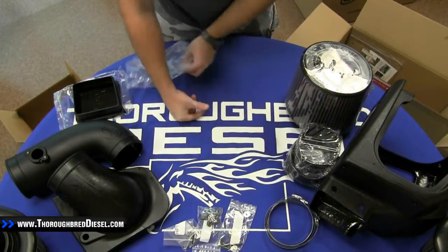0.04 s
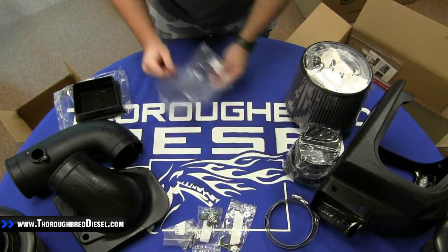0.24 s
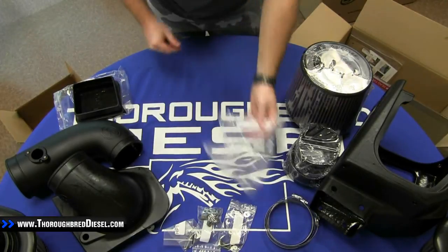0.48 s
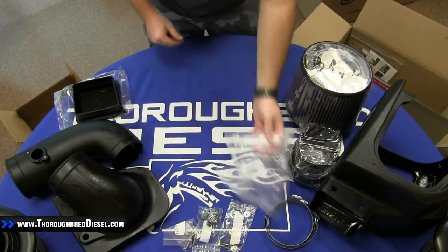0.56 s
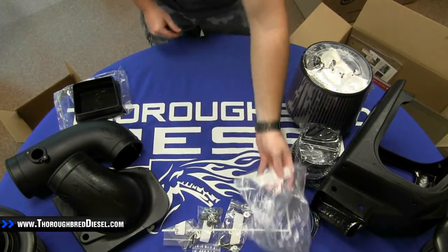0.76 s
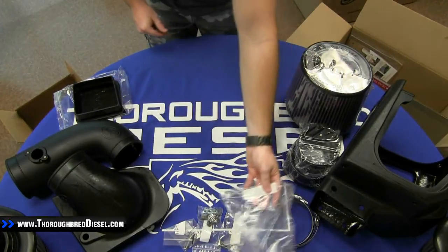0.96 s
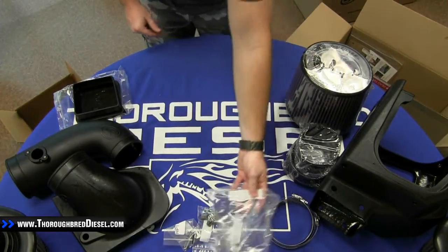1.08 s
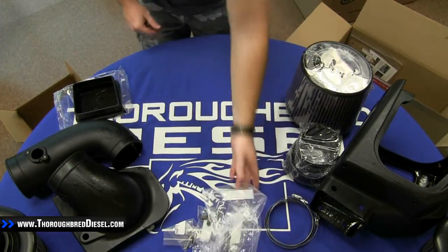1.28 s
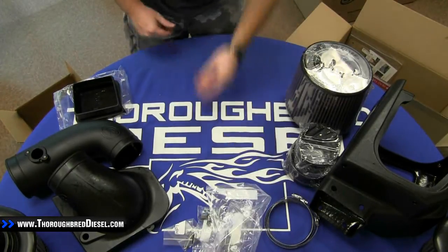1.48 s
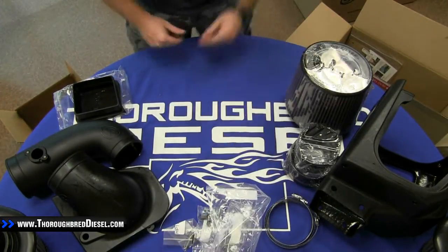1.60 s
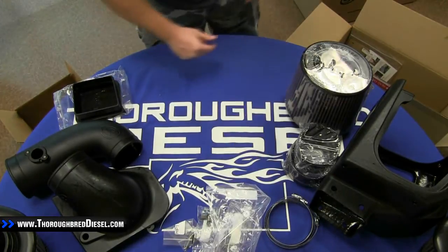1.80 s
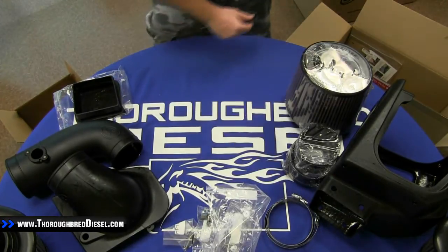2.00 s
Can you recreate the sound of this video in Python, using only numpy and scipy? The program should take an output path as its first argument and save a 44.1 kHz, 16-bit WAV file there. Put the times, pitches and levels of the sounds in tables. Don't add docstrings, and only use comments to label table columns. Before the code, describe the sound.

Crisp plastic bag rustling with a low table thump, a pause, then a brief crinkly landing

```python
import sys
import numpy as np
from scipy import signal
from scipy.fft import rfft, irfft, next_fast_len
from scipy.io import wavfile

SR = 44100
rng = np.random.default_rng(int(sys.argv[2]) if len(sys.argv) > 2 else 0)


def transcribe(u):
    v = np.clip(np.atleast_2d(u).T, -1, 1)
    q = np.round(v * 32767).astype(np.int16)
    wavfile.write(sys.argv[1], SR, q)


def voltage_ratio(decibels):
    exponent = np.asarray(decibels, float) / 20
    return 10 ** exponent


N = 90404
OPPOSITE = np.array([[1], [-1]])


def rms_one(x):
    return x / np.sqrt(np.mean(x ** 2) + 1e-20)


def level(rows):
    time_s, level_db = np.transpose(rows)
    return voltage_ratio(np.interp(np.arange(N) / SR, time_s, level_db, left=-140, right=-140))


def at_hz(points, hz):
    points_hz, points_db = np.transpose(points)
    return np.interp(np.log(hz), np.log(points_hz), points_db, left=-70, right=-70)


def drift(rate_hz):
    r = np.exp(-80 * np.pi * rate_hz / SR)
    white = rng.standard_normal(N // 40 + 2002)
    slow = signal.lfilter([1], [1, -2 * r, r * r], white)[2000:]
    return np.interp(np.arange(N) / 40, np.arange(len(slow)), rms_one(slow))


def ring(x, hz, t60_s):
    r = voltage_ratio(-60 / (t60_s * SR))
    w = 2 * np.pi * hz / SR
    return signal.lfilter([0, np.sin(w)], [1, -2 * r * np.cos(w), r * r], x + 1e-18)


def click(time_s, height=1):
    x = np.zeros(N)
    x[np.minimum(np.asarray(time_s) * SR, N - 1).astype(int)] = height
    return x


def colour(sources, spectrum, patchy_db, rate_hz):
    edges_hz = 20 * 2 ** np.arange(0, 9.9, 1 / 3)
    together = drift(rate_hz)
    for k, (low, high) in enumerate(zip(edges_hz, edges_hz[1:])):
        hz = np.sqrt(low * high)
        sos = signal.butter(2, [low, high], "band", fs=SR, output="sos")
        band = signal.sosfilt(sos, sources[k % len(sources)])
        flicker_db = patchy_db * (together + 1.6 * drift(rate_hz))
        yield hz, band * voltage_ratio(at_hz(spectrum, hz) + flicker_db)


def noise(spectrum, patchy_db, rate_hz):
    white = rng.standard_normal((2, N))
    return rms_one(sum(band for _, band in colour(white, spectrum, patchy_db, rate_hz)))


def snaps():
    # (time [s], peak
    # [dB], ring [Hz], length [cycles], trailing flurry [dB])
    lift_snaps = [(.0128, -38.5, 4500, 2.5, 2), (.016, -41, 1340, 7.1, 0), (.0215, -47, 4200, 4.5, -7),
                  (.0308, -21.5, 4380, 1.95, -4.5), (.0368, -39, 6500, 3.5, -3),
                  (.0453, -25.5, 6260, 2.2, -3), (.0525, -25, 1350, 1.8, -6.5), (.0532, -29, 9850, 7.6, -9),
                  (.0605, -36, 2520, 1.6, -11), (.034, -38.5, 1450, 4.3, -16), (.047, -36, 1500, 4.6, -6),
                  (.057, -36.5, 1140, 4.8, -3), (.053, -23, 5420, 5.2, 1.5), (.0682, -47, 3000, 0.9, 12),
                  (.0883, -25.5, 2780, 1.8, -2), (.0903, -28.5, 4580, 5.2, 2.5),
                  (.0915, -33, 10300, 5, -12), (.0988, -31, 5250, 3, -8), (.1095, -30, 6540, 2.5, -6),
                  (.1385, -43, 4500, 7, -17), (.1498, -37, 2600, 1.1, -28), (.179, -42, 2150, 3.2, -6),
                  (.1172, -33, 4560, 2.8, 6), (.119, -29, 830, 2.03, -38), (.2384, -27.5, 5280, 2.8, -11),
                  (.2545, -33.5, 5050, 7.2, -27), (.2665, -38.5, 3820, 3.3, 0.5), (.2688, -40, 6200, 3, -9),
                  (.283, -41, 5500, 1.6, 5), (.2878, -36, 5200, 2, -10), (.2987, -32.5, 5900, 3.2, -2),
                  (.3032, -31.5, 5750, 5.2, 0), (.32395, -10.5, 5050, 4.4, -17),
                  (.3341, -22, 4960, 3.2, -1), (.3245, -36.5, 1120, 2.7, -5),
                  (.3338, -32.5, 1027, 1.93, -27), (.3362, -26.5, 5700, 4.1, -5),
                  (.3505, -44, 9800, 6.5, -12)]
    land_snaps = [(1.223, -45.5, 2550, 1.3, 5.5), (1.2329, -29.5, 3940, 1.36, -8.5),
                  (1.239, -26, 5000, 1.5, -2.5), (1.2398, -38, 5660, 3.4, -12),
                  (1.2452, -43, 4650, 3.7, -5), (1.2457, -39, 1480, 1.6, -12),
                  (1.249, -27.5, 2850, 2.1, -3), (1.2493, -28, 4840, 4.8, -9), (1.2503, -34, 3540, 2.7, -9),
                  (1.2514, -28, 4500, 5.1, -1.5), (1.2538, -46, 3760, 2.3, -16),
                  (1.2625, -39, 2820, 3, -20), (1.2655, -52, 4500, 2.7, -8), (1.277, -46, 2970, 2.5, -3),
                  (1.306, -46.5, 1170, 1.2, -12), (1.3254, -38.5, 2500, 0.99, -9),
                  (1.3474, -45, 1490, 1.2, -6), (1.6966, -26, 3550, 1.32, -16.5),
                  (1.6978, -37.5, 2310, 2.1, -10)]
    fold_db, fold_t60_s = -40.5, 0.0094
    flurry_s, flurry_hz, flurry_width_hz = 0.0023, 4500, 10400
    size = 1500
    rows, out, t = lift_snaps + land_snaps, np.zeros(N), np.arange(size) / SR
    cut = signal.butter(1, [600, 7000], "band", fs=SR, output="sos")
    for time_s, peak_db, hz, cycles, flurry_db in rows:
        swell = np.sin(np.pi * np.minimum(t * hz / cycles, 1) ** 1.15)
        pop = -np.sin(2 * np.pi * hz * t) * swell
        pop = pop + voltage_ratio(fold_db) * ring(pop, hz, fold_t60_s)
        z = rng.standard_normal(size)
        flurry = signal.sosfilt(cut, z * np.abs(z) * np.exp(-t / flurry_s))
        flurry = flurry + 0.58 * ring(flurry, flurry_hz, 1.6 / flurry_width_hz)
        flurry = flurry / np.abs(flurry).max()
        i = int(time_s * SR)
        out[i:i + size] += voltage_ratio(peak_db) * (pop + voltage_ratio(flurry_db) * flurry)
    return out


def crinkle():
    # (time [s], level [dB])
    lift = [(0, -60), (.03, -46.5), (.06, -44.5), (.115, -44.5), (.15, -49.5), (.23, -58), (.305, -51.5),
            (.323, -54), (.338, -48.5), (.42, -70), (.62, -66)]
    land = [(1.21, -74), (1.225, -52.5), (1.25, -41), (1.275, -59.5), (1.3, -63), (1.34, -63), (1.4, -65),
            (1.5, -78)]
    stir = [(.84, -106), (.91, -63), (1.0, -82)]
    # (frequency [Hz], density [dB per Hz])
    film_colour = [(150, -45), (250, -0.5), (356, -5), (1160, -8), (1320, -8.5), (2310, -13), (4610, -8.5),
                   (10300, -22.5), (14000, -35)]
    clicks_per_s, spread_db = 2500, 3.5
    sizes = voltage_ratio(spread_db * np.minimum(rng.exponential(1, N), 3.2)) * rng.choice([-1, 1], N)
    born = rng.random(N) < clicks_per_s * voltage_ratio(3 * drift(60)) / SR
    grains = sizes * born + 0.26 * rng.standard_normal(N)
    film = sum(band for _, band in colour([grains, -grains], film_colour, patchy_db=1.2, rate_hz=40))
    return rms_one(film) * (level(lift) + level(land) + level(stir))


def bag():
    film_top_hz = 11100
    sos = signal.butter(6, film_top_hz, fs=SR, output="sos")
    return signal.sosfilt(sos, snaps() + crinkle())


def table_thumps():
    # (time [s], strength [0-1])
    thumps = [
        (.126, .98),
        (.1521, .72),
    ]
    # (frequency [Hz], signed height, t60 [s])
    low_modes = [(93.67, .503, .214), (108.41, -.6, .18), (111.53, .067, .379), (127.63, .474, .144),
                 (134.14, -.361, .5), (152.7, -.102, .08)]
    # (frequency [Hz], level [dB], t60 [s])
    weak_modes = [(64, -35, .35), (174, -38, .3), (198, -38, .3), (229, -32, .2), (281, -34, .2),
                  (255, -37, .08), (312, -33, .1), (343, -38, .12), (361, -40, .15), (700, -44, .06),
                  (1070, -45, .05)]
    blows = click(*np.transpose(thumps))
    out = sum(height * ring(blows, hz, t60_s) for hz, height, t60_s in low_modes)
    for k, (hz, db, t60_s) in enumerate(weak_modes):
        out += voltage_ratio(db) * (-1) ** k * ring(blows, hz, t60_s)
    out = signal.sosfilt(signal.butter(2, 40, "high", fs=SR, output="sos"), out)
    return signal.lfilter([.25], [1, -.75], out)


def table_shake():
    # (time [s], level [dB])
    shake = [(0, -42), (.035, -33), (.1, -41), (.2, -41), (.3, -51.5), (.42, -64), (.55, -69.5), (.68, -63)]
    # (frequency [Hz], width [Hz], level [dB])
    resonances = [(119.5, 30, 3.5), (193, 16, -2.5), (350, 35, -4.5), (81, 15, -4.5), (467, 60, -20)]
    sos = signal.butter(2, 60, "high", fs=SR, output="sos")
    white = signal.sosfilt(sos, rng.standard_normal(N))
    out = sum(voltage_ratio(db) * rms_one(ring(white, hz, 2.0 / width_hz)) for hz, width_hz, db in resonances)
    return level(shake) * rms_one(out)


def taps():
    # (time [s], level [dB], frequency [Hz], t60 [s])
    tap_rows = [(.12, -31, 260, .02), (.545, -55, 350, .06), (.555, -58, 520, .05), (.61, -57, 500, .06),
                (.955, -56, 330, .03), (1.134, -50, 700, .012), (1.134, -48, 140, .04),
                (1.262, -45, 280, .05), (2.0143, -48, 620, .008), (2.0159, -40.5, 480, .009),
                (2.0247, -49, 560, .012), (2.0268, -46, 390, .05), (2.0343, -48, 400, .06),
                (2.0245, -55, 930, .03), (2.031, -54, 760, .04), (2.044, -50, 560, .03)]
    out = np.zeros(N)
    for time_s, db, hz, t60_s in tap_rows:
        contact = signal.lfilter([.04], [1, -1.6, .64], click(time_s))
        out += voltage_ratio(db) * ring(contact, hz, t60_s)
    return out


def air_pushes():
    # (time [s], signed height, length [s])
    pushes = [
        (.3245, 0.049, 0.0051),
        (0.352, -0.0076, 0.029),
        (1.237, 0.009, 0.022),
        (1.251, -0.0054, 0.029),
        (1.27, -0.0088, 0.026),
    ]
    t = np.arange(N) / SR
    out = np.zeros(N)
    for time_s, height, length_s in pushes:
        phase = np.clip((t - time_s) / length_s, 0, 1)
        out += height * np.sin(np.pi * phase ** .5) ** 2
    return out


def cloth():
    # (time [s], level [dB])
    rub = [(1.5, -79), (1.56, -62.5), (1.61, -57), (1.655, -64), (1.69, -54.5), (1.72, -60), (1.77, -67.5),
           (1.82, -96)]
    # (frequency [Hz], density [dB per Hz])
    rub_colour = [(180, -58), (300, 5), (363, -5), (408, -24), (745, -3), (814, -6), (4090, -3),
                  (10000, -25), (13000, -58), (22000, -120)]
    return level(rub) * noise(rub_colour, patchy_db=0.5, rate_hz=16)


def room(x):
    t60_s, room_db, side_db, wall_cut_hz = 0.36, -26.5, -16.5, 13000
    size = next_fast_len(N + SR)
    w = 2 * np.pi * np.arange(size // 2 + 1) / size
    dull = 1 / (1 + 1j * w * SR / (2 * np.pi * wall_cut_hz)) ** 0.071
    out = np.zeros((2, len(w)), complex)
    for k, lag in enumerate(rng.uniform(.006, .035, 24) * SR):
        loop = voltage_ratio(-60 * lag / SR / t60_s) * dull * np.exp(-1j * w * lag)
        out[k % 2] += (-1) ** (k // 2) * loop / (1 - loop)
    for lag in np.array([.0011, .0023, .0047]) * SR:
        delay = np.exp(-1j * w * lag)
        out *= (delay - .6) / (1 - .6 * delay)
    mid, side = irfft(out * rfft(x, size), size)[:, :N]
    return voltage_ratio(room_db) * (mid + voltage_ratio(side_db) * side * OPPOSITE)


def rumble():
    # (frequency [Hz], density [dB per Hz])
    rumble_colour = [(20, -3.5), (48, -7), (58, 4.5), (97, -0.5), (150, 1), (195, 0), (228, -25),
                     (520, -24), (620, -38)]
    capsule_colour = [(20, -8), (100, -8.5), (300, -23.5), (500, -52)]
    # (time [s], level [dB])
    rumble_rows = [(0.45, -55.5), (1.098, -60), (1.13, -60), (1.202, -63), (1.246, -49.5), (1.526, -64),
                   (1.748, -55.5), (2.002, -64), (2.05, -54)]
    side_db = -74.5
    mid = noise(rumble_colour, patchy_db=1.5, rate_hz=26)
    side = noise(capsule_colour, patchy_db=-2.2, rate_hz=11)
    gain = level([(0.045, -38.5)] + list(rumble_rows))
    return gain * mid + voltage_ratio(side_db) * side * OPPOSITE


def hiss():
    # (frequency [Hz], density [dB per Hz])
    hiss_colour = [(180, -61), (300, -1), (343, -6.5), (667, -11), (994, -10.5), (1170, -11.5),
                   (4670, -13.5), (16000, -20)]
    # (frequency [Hz], likeness [0-1])
    likeness = [(60, 0.87), (180, 0.46), (550, 0.19), (1650, 0.23), (4970, 0.092), (15000, 0.016)]
    hiss_db = -63
    white = rng.standard_normal((2, 2, N))
    out = 0
    for hz, (mid, side) in colour(white, hiss_colour, patchy_db=.15, rate_hz=8):
        inside_hz = np.clip(hz, likeness[0][0], likeness[-1][0])
        alike = np.clip(at_hz(likeness, inside_hz), 0, 1)
        out = out + np.sqrt(1 + alike) * mid + np.sqrt(1 - alike) * side * OPPOSITE
    return voltage_ratio(hiss_db) * rms_one(out)


def scene():
    near = bag() + cloth()
    overload = 1.5
    direct = near - overload * near ** 3
    table = table_thumps() + table_shake() + taps()
    return direct + room(near) + table + air_pushes() + rumble() + hiss()


def top_cut(x):
    return signal.sosfilt(signal.butter(12, 16530, fs=SR, output="sos"), x)


def record(dry):
    mic_low_hz, cutoff_hz = 2.7, 15830
    x = signal.sosfilt(signal.butter(1, mic_low_hz, "high", fs=SR, output="sos"), dry)
    x = signal.sosfilt(signal.cheby2(14, 40, cutoff_hz, fs=SR, output="sos"), x)
    return top_cut(x)


dry = scene()
out = record(dry)
transcribe(out)
```